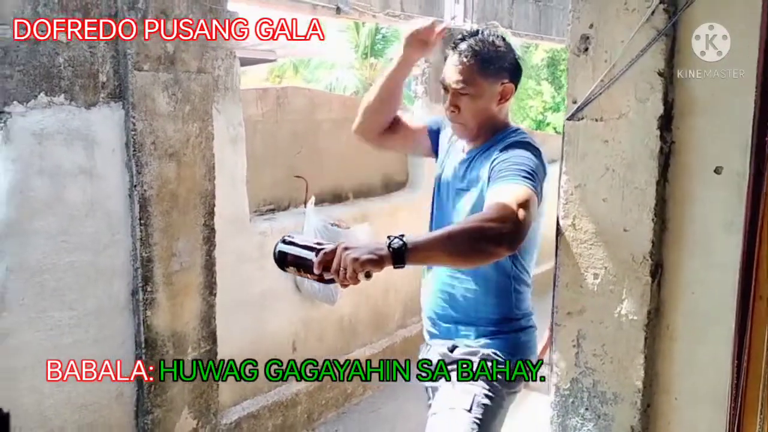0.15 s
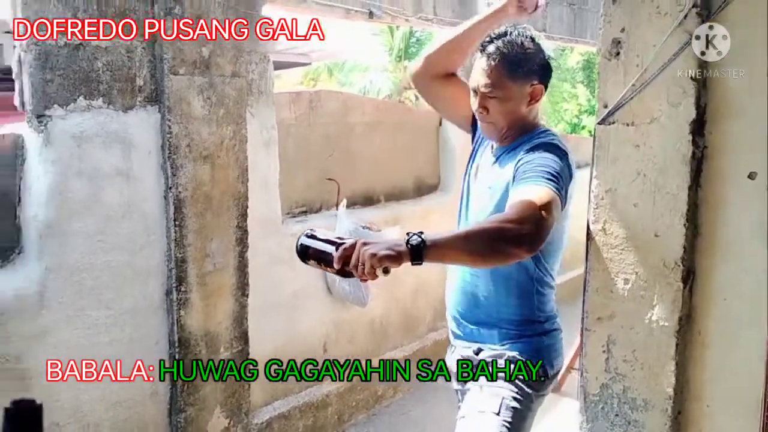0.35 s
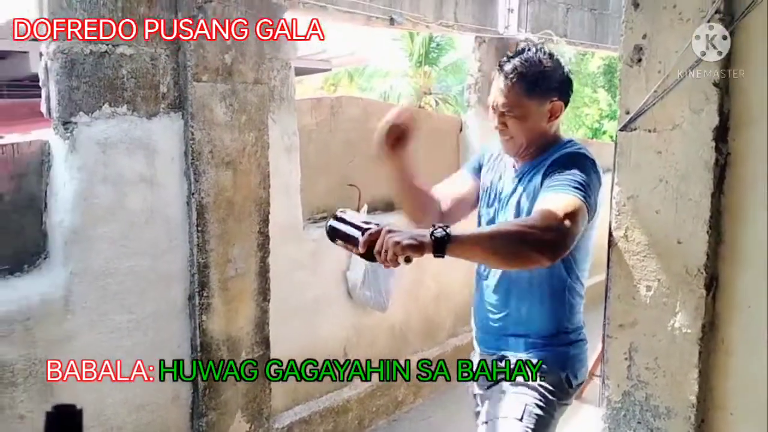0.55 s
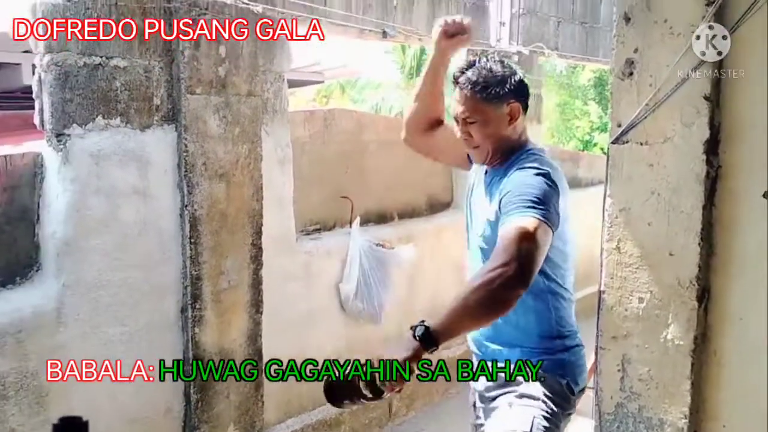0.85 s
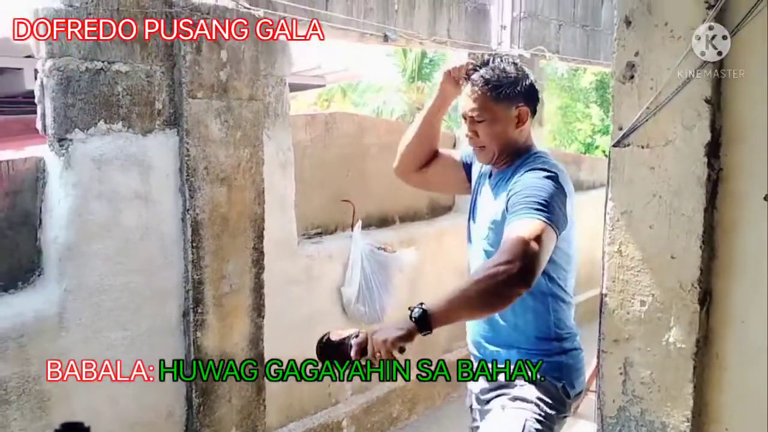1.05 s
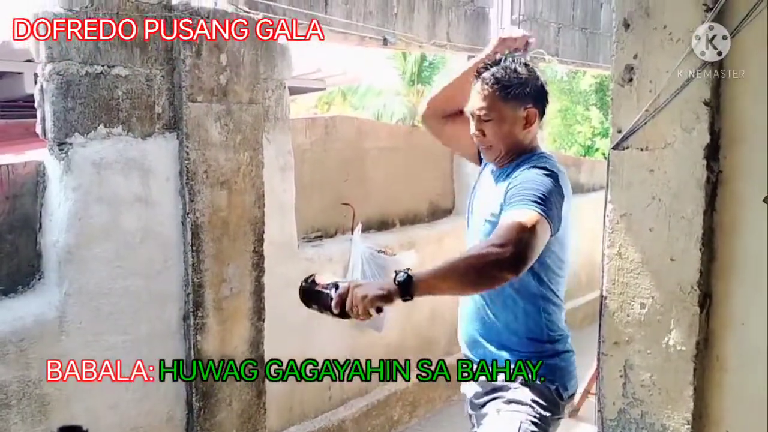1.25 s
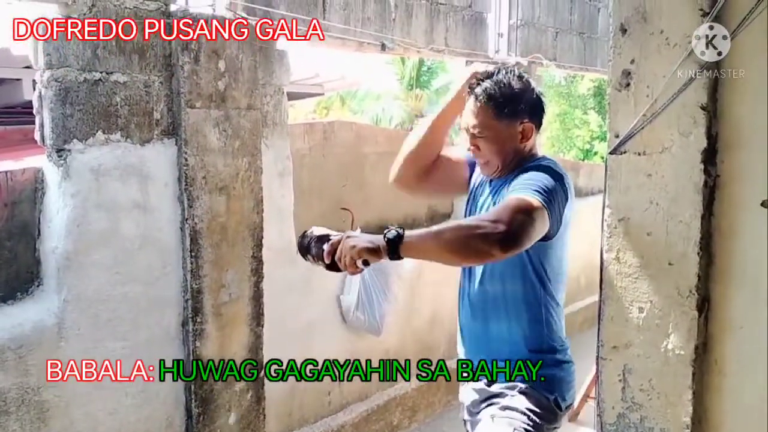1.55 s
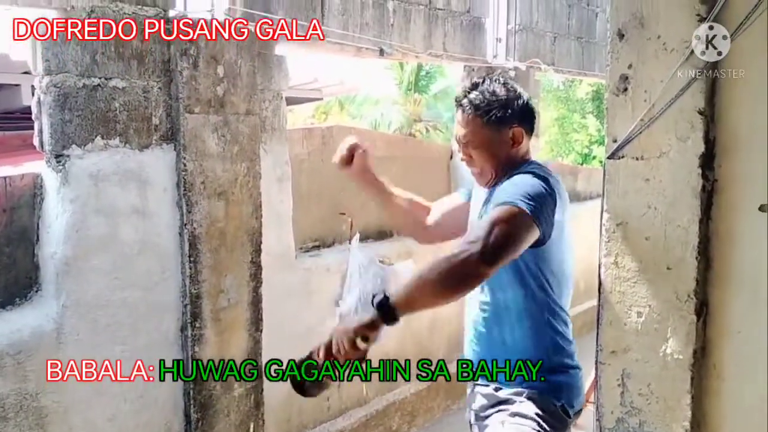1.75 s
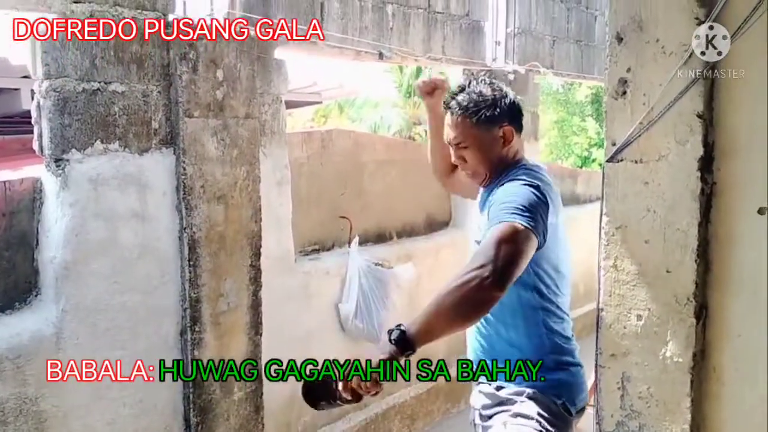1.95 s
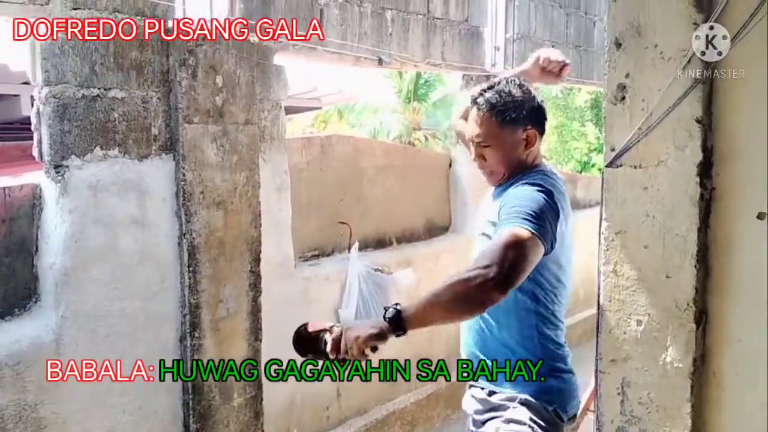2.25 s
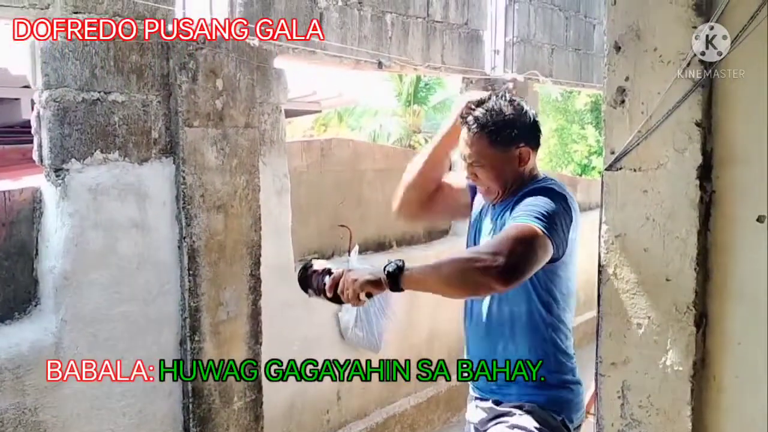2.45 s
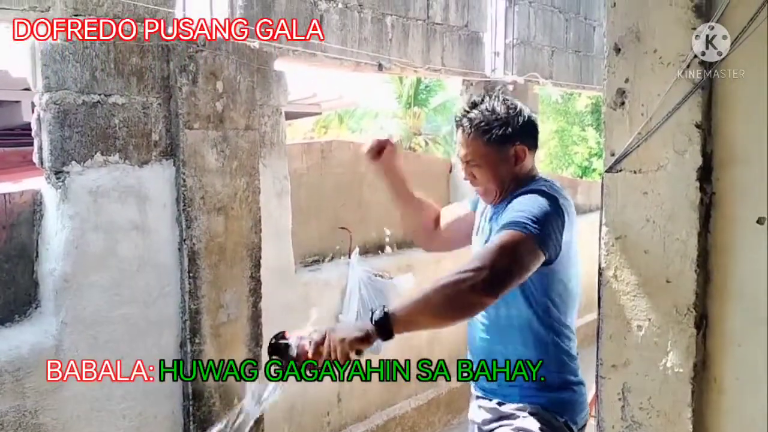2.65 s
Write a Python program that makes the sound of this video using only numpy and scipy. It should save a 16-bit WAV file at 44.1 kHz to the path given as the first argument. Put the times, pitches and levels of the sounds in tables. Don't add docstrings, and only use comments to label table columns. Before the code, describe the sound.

Three sharp bare-hand slaps hit a water-filled glass bottle about a second apart; loose glass ticks and rings on concrete between them, drops spatter, then the last blow releases a splashing gush. Close, bright microphone, narrow alley.

```python
import sys
import numpy as np
from scipy import signal
from scipy.io import wavfile
from scipy.ndimage import uniform_filter1d

SR = 44100
rng = np.random.default_rng(int(sys.argv[2]) if len(sys.argv) > 2 else 0)


def pcm_store(signal):
    levels = np.round(np.clip(np.atleast_2d(signal), -1, 1) * 32767)
    wavfile.write(sys.argv[1], SR, levels.astype(np.int16).T)


def how_loud(loudness_db):
    steps = np.asarray(loudness_db, float) / 20
    return 10 ** steps


N = 123479

# freq_hz, level_db
STREET_SPECTRUM = [(20, -35), (45, -11), (130, 0.5), (260, -7.5), (1000, -7.5), (1900, -10.5),
                   (3500, -23.5), (6000, -39)]
# freq_hz, level_db
HUM_TONES = [(985, -66.5), (3250, -75.5), (3612, -74)]
# touch_s, blow_s, touch_db, blow_db, blow_length_s
SLAPS = [
    (0.1876, 0.1922, -41, -16, 0.0071),
    (1.2334, 1.238, -19.5, -10.5, 0.0034),
    (2.128, 2.1316, -33, -11, 0.0072),
]
# freq_hz, level_db
SLAP_SPECTRA = [
    [(60, -24), (200, -8.5), (850, -9), (1400, 5), (2200, 2), (4000, -7), (8000, -13.5), (16000, -18)],
    [(60, -11), (300, -17), (450, -7), (1100, 1), (2200, 0.5), (4000, -7.5), (8000, -15.5), (16000, -17)],
    [(60, -14), (230, -1), (550, -9.5), (1100, -1.5), (2200, 2), (4000, -6), (8000, -12.5), (16000, -12.5)],
]
SLAP_WALL_DB = [-3.5, -7, -3.5]
# start_s, length_s, level_db
PALM_PUSHES = [
    (1.2419, 0.0058, -3),
    (2.1381, 0.0048, -12),
]
# start_s, pitch_hz, level_db, t60_s
KNOCKS = [(0.21, 284.6, -25, 0.12), (.672, 703, -42, 0.08), (0.73, 124, -33.5, 0.052),
          (1.2955, 150, -32.5, 0.23), (2.149, 242, -28.5, 0.31), (2.4, 127, -30.5, 0.12),
          (2.629, 134, -41, 0.22), (0.37, 2850, -27.5, 0.056), (.36, 2200, -33, 0.049),
          (0.39, 1453, -31, 0.081), (1.239, 305, -12.5, 0.033), (1.72, 690, -50.5, 0.45),
          (2.27, 620, -35.5, 0.1), (1.407, 2000, -31.5, .07), (1.444, 1970, -29.5, 0.074),
          (2.19, 327, -37, 0.22), (2.388, 820, -27, 0.055), (1.62, 104, -47, 0.14), (1.68, 120, -43, 0.093)]
# freq_hz, level_db, t60_s
PIECE_MODES = [(4070, 3.5, 0.41), (6780, -3.5, 0.22), (9500, 1.5, 0.1), (13050, 1, 0.05), (4280, -7, 0.028)]
# start_s, tick_db, ring_db, third_mode_db, tumble_hz
PIECE_HITS = [(.287, -60, -86, 36, 27), (0.358, -30, -77, -18, 12), (0.365, -30, -40, -19, 37),
              (0.37, -26, -47.5, 0, 6.7), (0.7071, -15, -23, 11, 25.4), (0.711, -20.5, -31, 16, 52),
              (0.7177, -24, -27, 8.5, 43), (.747, -44, -30, 4.5, 17), (.908, -27.5, -42, -1, 30),
              (0.913, -21, -33.5, -2.5, 34.8), (1.125, -16, -25.5, -14, 12.6), (1.204, -60, -38.5, -22, 6),
              (1.333, -16, -46, 0, 11)]
# freq_hz, level_db, t60_s
SHARD_MODES = [(5757, 1, 0.42), (9160, 0, 0.21), (12720, -2, .09), (15320, -7, .11)]
# start_s, tick_db, ring_db, third_mode_db,
# tumble_hz
SHARD_HITS = [(2.3507, -17.5, -58, .1, 17), (2.3874, 0.5, -32.5, -5, 15), (2.399, -5, -19.5, -4, 18.6),
              (2.495, -25, -60, -3, 30), (2.5461, -10, -60, -7, 30), (2.618, -3.5, -28, -14, 10),
              (2.622, -8, -24.5, -18, 26), (2.6994, -11.5, -50, 8, 30), (2.794, -22, -47, 6, 29)]
# freq_hz, level_db
CLACK_SPECTRUM = [(100, -76), (500, -6.5), (900, -7), (1800, 7.5), (3000, 5.5), (5000, -7.5), (9000, -13.5),
                  (16000, -9.5)]
# freq_hz, level_db
THUD_SPECTRUM = [(300, -22), (800, 1), (1800, 5), (2800, 4), (4000, -25), (16000, -24)]
# time_s, level_db, centre_hz
SWISH = [(.53, -72, 2400), (.58, -57.5, 2520), (.68, -53.5, 2350), (.72, -57, 2370)]
# time_s, level_db, centre_hz
SLOSH = [(1.3, -85, 880), (1.345, -33.5, 1120), (1.39, -39.5, 1140), (1.42, -40.5, 1905), (1.46, -46, 1890),
         (1.53, -60, 1860)]
# time_s, level_db
SPRAY = [(0, -94), (.54, -103), (.57, -58.5), (.7, -74), (1.2, -56), (1.54, -56), (1.585, -73), (1.6, -60),
         (1.67, -57), (1.69, -52), (1.76, -41), (1.86, -66), (1.94, -78), (1.96, -70), (2.03, -69),
         (2.12, -78), (2.3, -53.5), (2.8, -58)]
# start_s, peak_db, brightness_db
DROPS = [(0.6235, -49, -1), (0.6756, -41, -10), (0.8649, -34.5, -12), (0.957, -44, -20), (0.9806, -47, -12),
         (1.0114, -47, -13), (1.0646, -45, -15), (1.0817, -49, -18), (1.4588, -34.5, -15),
         (1.5489, -35, -27), (1.5899, -32.5, -3), (1.6167, -39, -3), (1.6287, -38, -6), (1.6506, -39, -7),
         (1.6813, -34.5, -7), (1.6881, -23.5, -15), (1.7324, -24.5, -25), (1.7377, -28, -13),
         (1.7474, -42, -11), (1.7699, -40, -12), (1.7884, -39, -5), (1.8, -46, 1), (1.8141, -27, -17),
         (1.843, -39, -5), (1.8711, -42, -4), (1.8902, -51, -14), (1.952, -40.5, -5), (1.9709, -33, -14),
         (1.975, -39, -15), (1.9959, -58, -6), (1.9971, -33, -7), (2.012, -36, -5), (2.0278, -22, -26),
         (2.0306, -32, -16), (2.071, -36.5, -8), (2.089, -37, -4.5), (2.683, -11, -30), (2.6988, -23, -27),
         (2.7084, -27, -7)]
# start_s, level_db
SPLATS = [
    (1.5463, -30),
    (1.688, -24),
    (2.028, -44),
]
# freq_hz, level_db
SPRAY_SPECTRUM = [(500, -54), (2000, 1.5), (5000, -7), (7000, -5), (10000, -8), (16000, 0)]
# freq_hz, level_db
SPIT_LOW_SPECTRUM = [(800, -57), (2500, -6.5), (5000, -7), (8000, -5), (10500, -12.5), (16000, -33)]
# freq_hz, level_db
SPIT_HIGH_SPECTRUM = [(6000, -55), (9500, -7), (12000, 0), (16000, 3)]
# time_s, level_db
GUSH_FLOW = [(2.349, -44), (2.352, -33.5), (2.385, -37.5), (2.392, -16), (2.415, -17), (2.44, -25.5),
             (2.49, -26), (2.5, -25), (2.535, -24), (2.548, -22.5), (2.575, -22.5), (2.612, -27),
             (2.624, -21.5), (2.64, -26.5), (2.72, -33.5), (2.785, -61), (2.8, -19.5)]
# freq_hz, level_db
GUSH_SPECTRUM = [(60, -35), (140, -13), (400, -10.5), (800, -3), (1800, 3.5), (3000, 2.5), (4500, -10),
                 (16000, -24.5)]
# freq_hz, t60_s
ALLEY_DECAY = [(100, 0.48), (260, 0.23), (700, 0.4), (1840, 0.28), (4850, 0.28), (12800, 0.24)]
# freq_hz, level_db
MIC_RESPONSE = [(4500, -0.5), (6000, -7), (7000, -2), (8400, 11.5), (9800, -2), (13500, -7), (15300, 0.5)]


def read(points, hz):
    table_hz, value = np.transpose(points)
    return np.interp(np.log(hz + 1), np.log(table_hz + 1), value)


def evened(x):
    return x / np.sqrt(np.mean(x ** 2) + 1e-20)


def smooth_noise(width):
    once = uniform_filter1d(rng.standard_normal(N), width)
    return evened(uniform_filter1d(once, width))


def add(mix, start_s, sound):
    part = mix[round(start_s * SR):][:len(sound)]
    part += sound[:len(part)]


def colour(x, points):
    level_db = read(points, abs(np.fft.fftfreq(4096, 1 / SR)))
    log_gain = level_db * np.log(10) / 20
    taps = np.fft.ifft(np.exp(np.conj(signal.hilbert(log_gain)))).real[:2048]
    return signal.oaconvolve(x, taps)[:len(x)]


def along(rows, col):
    rows = np.array(rows)
    before = rows[0, col] - 40 * (col == 1)
    return np.interp(np.arange(N) / SR, rows[:, 0], rows[:, col], before)


def grains(per_s, spread_db, count=N):
    chance, sign, size = rng.random((count, 3)).T
    size_db = spread_db * np.minimum(-np.log(size + 1e-9), 4)
    return evened((chance < per_s / SR) * np.sign(sign - .5) * how_loud(size_db))


def alley(x, wet_db, gap_s=0.00062, feed=None):
    echoes = grains(per_s=9800, spread_db=1.86, count=SR // 2)
    hz, t, z = signal.stft(echoes, SR, nperseg=128)
    decay = how_loud(-60 * t / read(ALLEY_DECAY, hz)[:, None])
    tail = signal.istft(z * decay, SR, nperseg=128)[1]
    tail = tail * np.clip(np.arange(len(tail)) / SR / gap_s - .5, 0, 1)
    source = x if feed is None else feed
    return x + how_loud(wet_db) * signal.fftconvolve(source, tail / np.linalg.norm(tail))[:N]


def air():
    t = np.arange(N) / SR
    swell = smooth_noise(1500)
    wash_db = -58 + 0.19 * swell + 3.8 * np.clip(t / 0.4, 0, 1)
    wash = evened(colour(rng.standard_normal(N), STREET_SPECTRUM)) * how_loud(wash_db)
    fade = how_loud(-15 * np.clip((t - .15) / 0.067, 0, 1))
    hum = sum(how_loud(db + 3) * fade * np.sin(2 * np.pi * hz * t + 1.5 * swell) for hz, db in HUM_TONES)
    return wash + hum


def slaps():
    out, t = np.zeros(N), np.arange(N) / SR
    for (touch_s, blow_s, touch_db, blow_db, length_s), tone, wet_db in zip(
            SLAPS, SLAP_SPECTRA, SLAP_WALL_DB):
        u = np.maximum(t - blow_s, 0) / length_s
        rise = np.clip((t - touch_s) / (blow_s - touch_s), 0, 1) * (t < blow_s)
        fall = (t >= blow_s) * (0.25 + 1.95 * u) * np.exp(-1.2 * u)
        shape = how_loud(touch_db + 5) * rise + how_loud(blow_db) * fall
        burst = colour(grains(per_s=12000, spread_db=2.5) * shape, tone)
        pulse = np.linalg.norm(shape) * (np.arange(N) == round(blow_s * SR))
        out += how_loud(13) * alley(burst, wet_db, gap_s=0.0095, feed=colour(pulse, tone))
    for start_s, length_s, db in PALM_PUSHES:
        u = np.arange(0, 6 * length_s, 1 / SR) / length_s
        add(out, start_s, how_loud(db) * np.sin(2 * np.pi * u) * np.exp(-1.7 * u))
    return out


def knocks():
    out, t = np.zeros(N), np.arange(12000) / SR
    for start_s, hz, db, t60_s in KNOCKS:
        swell = np.minimum(t / (0.0016 + 0.49 / hz), 1) ** 2
        add(out, start_s, how_loud(db - 60 * t / t60_s) * swell * np.sin(2 * np.pi * hz * t))
    return out


def glass(modes, hits, tick_spectrum, wet_db):
    tick, ring, t = np.zeros(N), np.zeros(N), np.arange(SR // 2) / SR
    tick_t = t[:200]
    chance = rng.random((len(hits), len(modes), 3))
    flights_s = np.diff([hit[0] for hit in hits] + [N / SR])
    for (start_s, tick_db, ring_db, third_db, tumble_hz), row, flight_s in zip(hits, chance, flights_s):
        held = how_loud(-18 * np.clip((t - flight_s) / 0.0021, 0, 1))
        clean = (tumble_hz / 30) ** 0.13
        grit = grains(per_s=6200, spread_db=2.5, count=200) * np.exp(-tick_t / 0.00096)
        add(tick, start_s, how_loud(tick_db) * ((tick_t == 0) + 0.026 * grit))
        for k, ((hz, db, t60_s), (phase, turn, detune)) in enumerate(zip(modes, row)):
            spin = tumble_hz * (1 + (.5 + .5 * detune) * k) * (t - 0.21 * t ** 2)
            throb = np.cos(np.pi * (spin - .22 + 0.5 * (turn - .5) * (k > 0))) + 0.05
            tone = np.sin(2 * np.pi * (hz * (1 + 0.0027 * (detune - .5)) * t + phase))
            decay = how_loud(ring_db + db + third_db * (k == 2) - 60 * t / (clean * t60_s))
            add(ring, start_s, decay * held * throb * tone * np.minimum(t / 0.0035, 1))
    ticks = alley(how_loud(14.5) * colour(tick, tick_spectrum), wet_db)
    return ticks + alley(how_loud(5.5) * ring, wet_db=-6.5)


def slosh(rows, width_hz):
    turn = np.exp(2j * np.pi * np.cumsum(along(rows, col=2)) / SR)
    pole = np.exp(-np.pi * width_hz / SR)
    x = grains(per_s=1100, spread_db=0.0) / turn
    for _ in range(2):
        x = signal.lfilter([1], [1, -pole], x)
    active = np.arange(N) < rows[-1][0] * SR
    return how_loud(along(rows, col=1)) * active * evened((turn * x).real)


def drops():
    low, high, big, t = np.zeros(N), np.zeros(N), np.zeros(N), np.arange(400) / SR
    for (start_s, db, bright_db), noise in zip(DROPS, rng.standard_normal((len(DROPS), 400))):
        spit = how_loud(db) * noise * np.exp(-t / 0.0012)
        add(low, start_s, how_loud(2.5) * spit)
        add(high, start_s, how_loud(bright_db + 13) * spit)
    for start_s, db in SPLATS:
        add(big, start_s, how_loud([db]))
    spray = how_loud(along(SPRAY, col=1)) * grains(per_s=2300, spread_db=-3.5)
    spits = colour(low, SPIT_LOW_SPECTRUM) + colour(high, SPIT_HIGH_SPECTRUM)
    rest = colour(spray, SPRAY_SPECTRUM) + colour(big, CLACK_SPECTRUM)
    return alley(spits + rest, wet_db=-2.0)


def gush():
    flow_db = along(GUSH_FLOW, col=1)
    clumps = smooth_noise(250)
    body = evened(colour(grains(per_s=6600, spread_db=2.0), GUSH_SPECTRUM))
    z = signal.stft(body, nperseg=256)[2]
    patches = uniform_filter1d(rng.standard_normal(z.shape), size=4, axis=0)
    patches = evened(uniform_filter1d(patches, size=6, axis=1))
    body = evened(signal.istft(z * how_loud(3.2 * patches), nperseg=256)[1][:N])
    body = body * how_loud(flow_db - 2.0 + 2.33 * clumps)
    fizz = evened(colour(grains(per_s=2700, spread_db=-3.0), SPRAY_SPECTRUM))
    fizz = fizz * how_loud(0.33 * flow_db - 15.5 + 0.3 * clumps)
    started = np.arange(N) > GUSH_FLOW[0][0] * SR
    return alley(body + fizz * started, wet_db=-9.0)


def scene():
    bottle = slosh(SLOSH, width_hz=960) + slosh(SWISH, width_hz=1100) + knocks()
    water = alley(bottle, wet_db=-9.0)
    piece = glass(PIECE_MODES, PIECE_HITS, CLACK_SPECTRUM, wet_db=4)
    shard = glass(SHARD_MODES, SHARD_HITS, THUD_SPECTRUM, wet_db=-2.0)
    mix = slaps() + piece + shard + drops() + gush() + water + air()
    return mix[None]


def top_cut(x):
    return signal.sosfilt(signal.butter(12, 16840, fs=SR, output="sos"), x)


def record(dry):
    low_cut = signal.butter(2, 55, "high", fs=SR, output="sos")
    x = signal.sosfilt(low_cut, colour(dry[0], MIC_RESPONSE))
    x = np.tanh(x / 1.02) * 1.02
    band_limit = signal.firwin(511, 15450, window=("kaiser", 6), fs=SR)
    x = signal.oaconvolve(x, band_limit, "same")
    return top_cut(x[None])


dry = scene()
out = record(dry)
pcm_store(out)
```